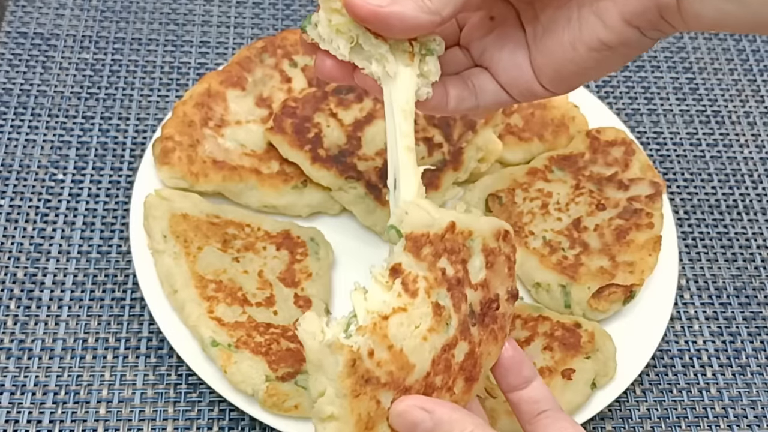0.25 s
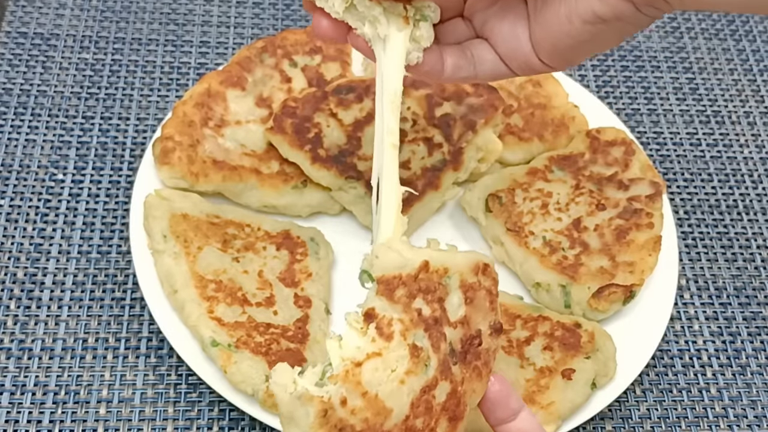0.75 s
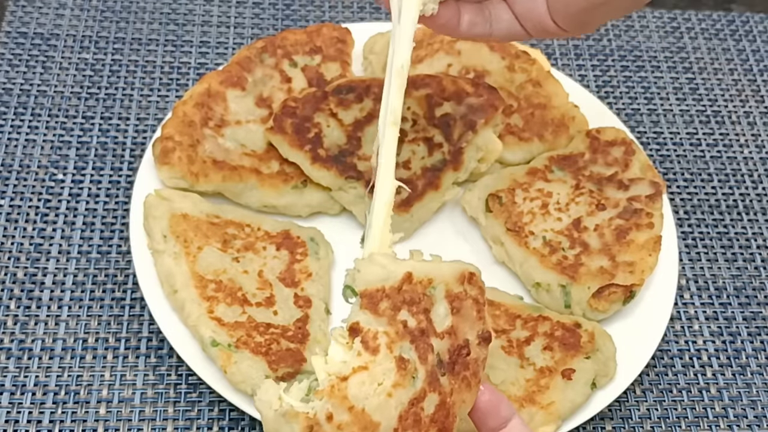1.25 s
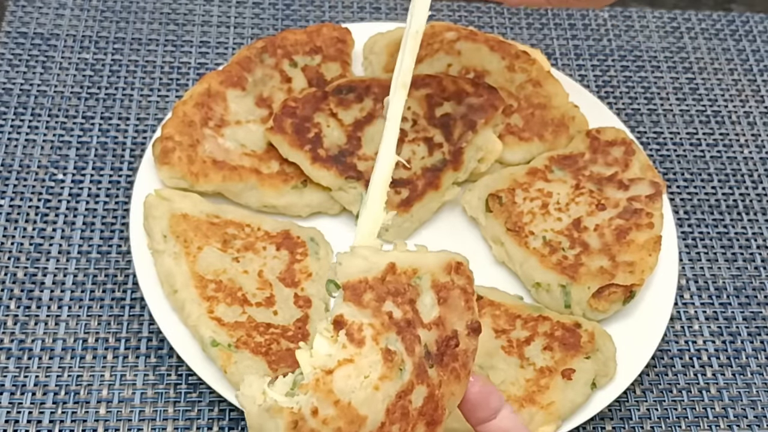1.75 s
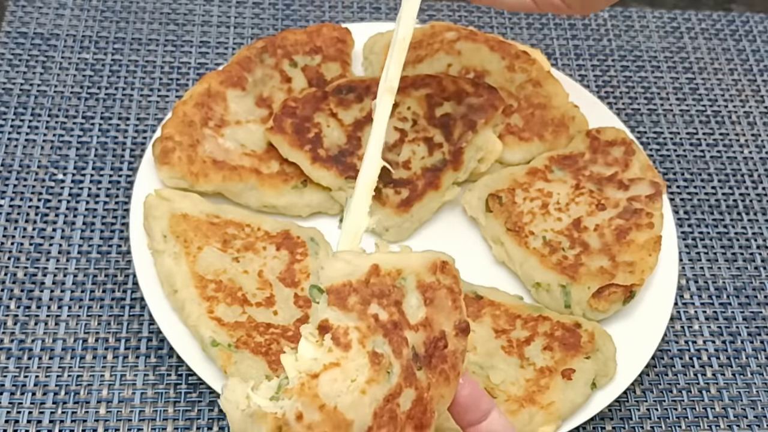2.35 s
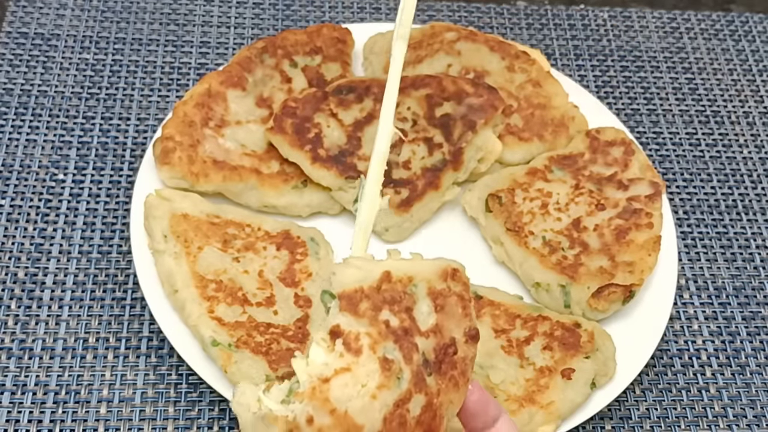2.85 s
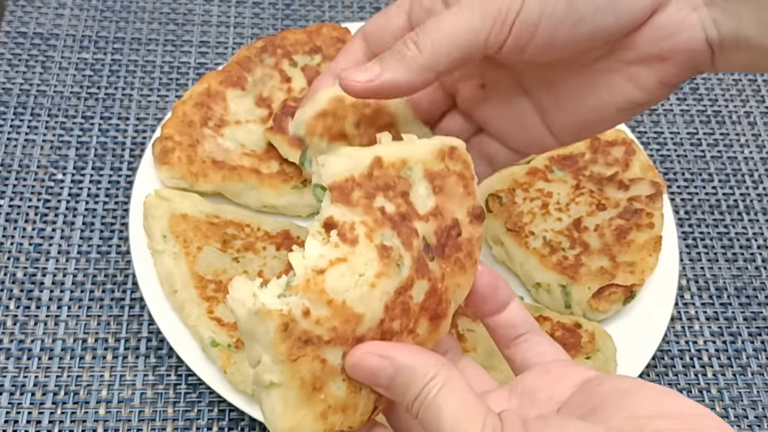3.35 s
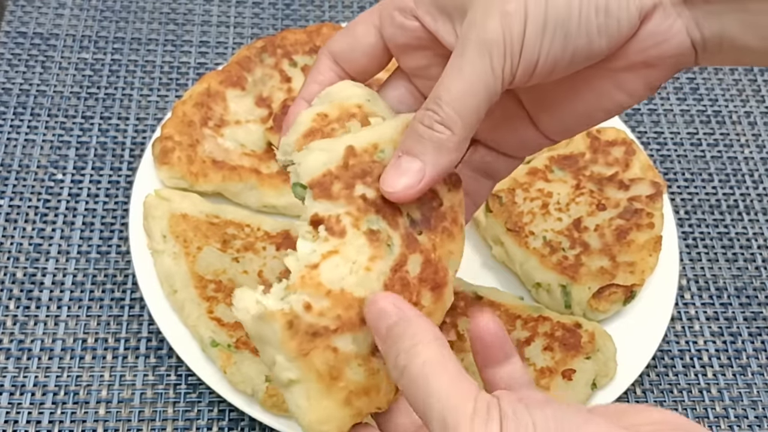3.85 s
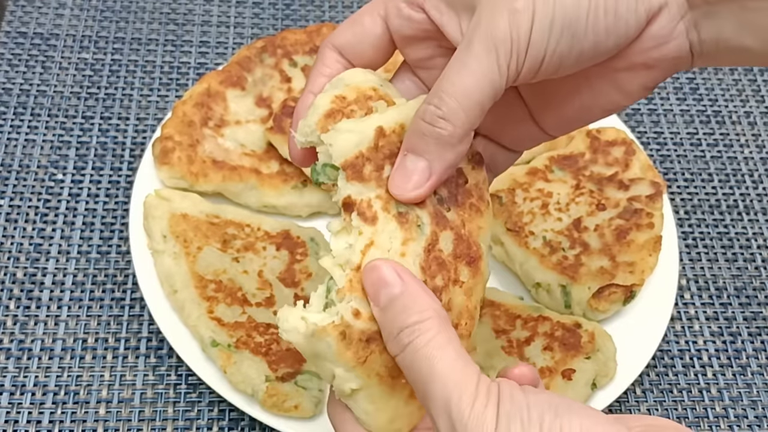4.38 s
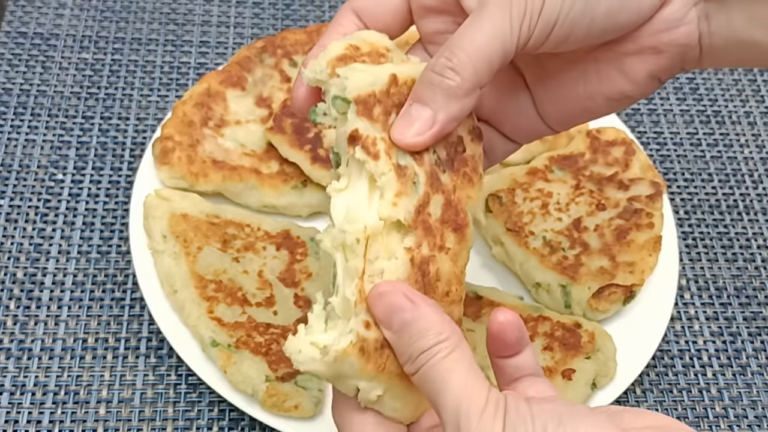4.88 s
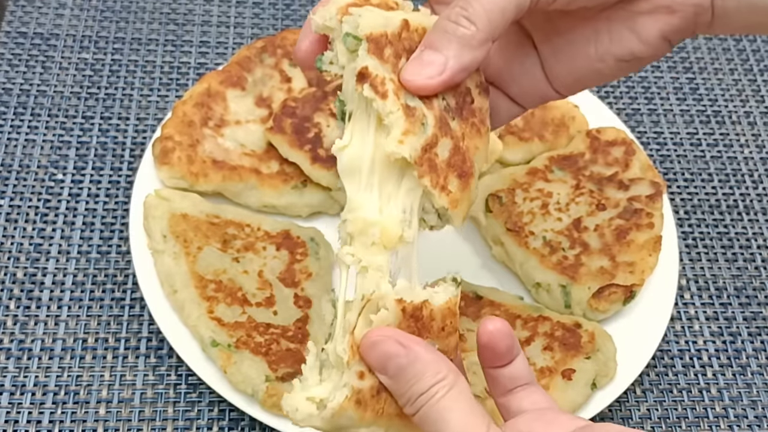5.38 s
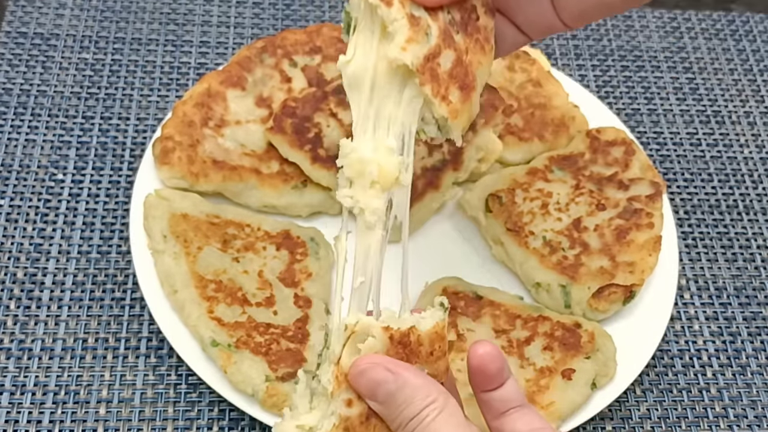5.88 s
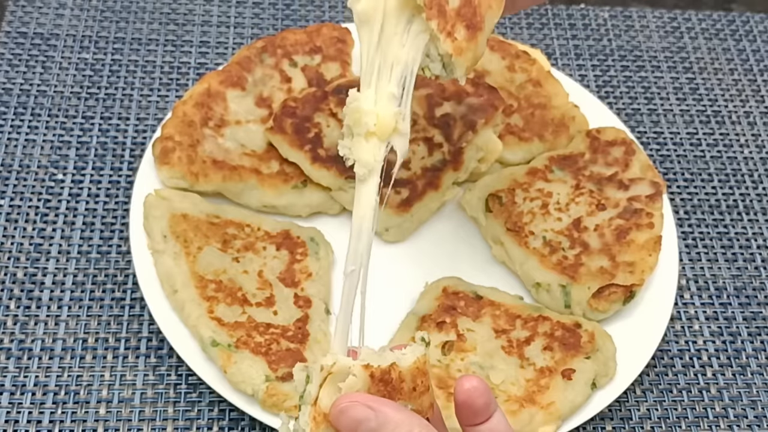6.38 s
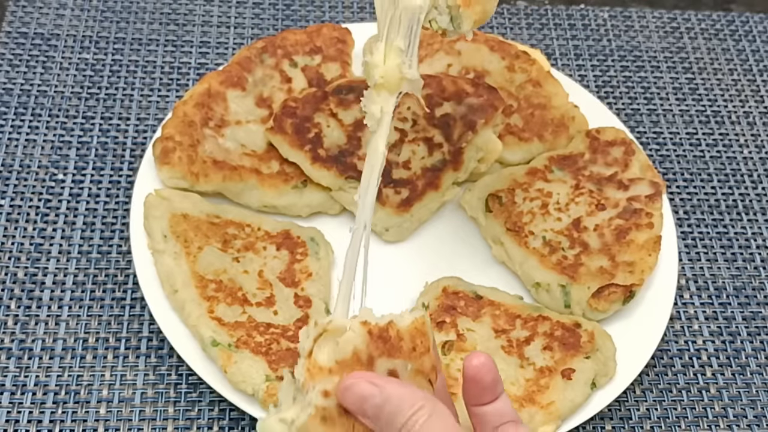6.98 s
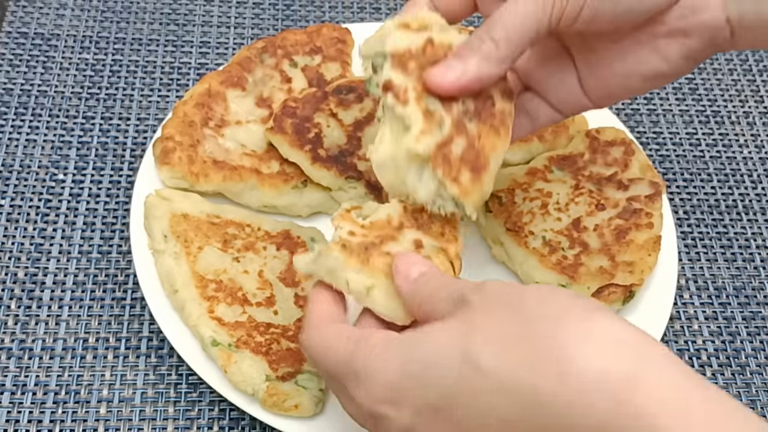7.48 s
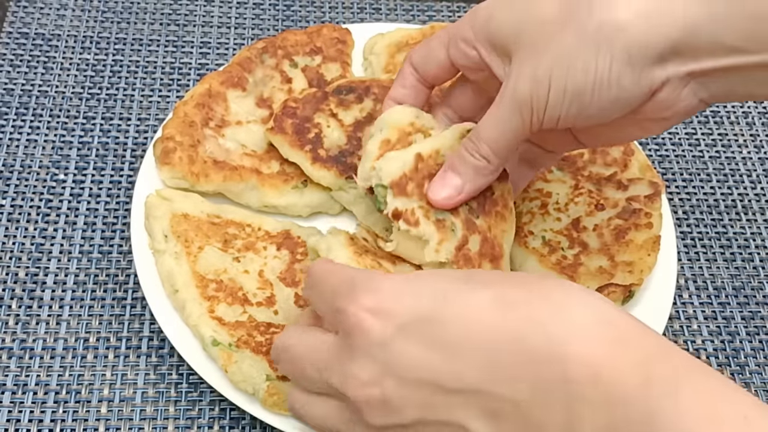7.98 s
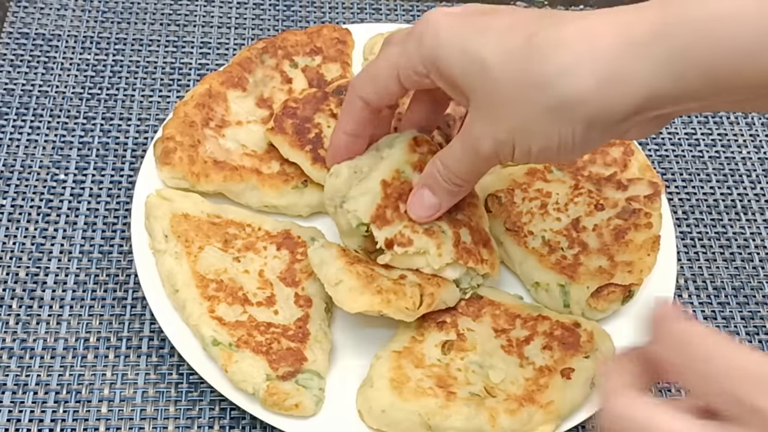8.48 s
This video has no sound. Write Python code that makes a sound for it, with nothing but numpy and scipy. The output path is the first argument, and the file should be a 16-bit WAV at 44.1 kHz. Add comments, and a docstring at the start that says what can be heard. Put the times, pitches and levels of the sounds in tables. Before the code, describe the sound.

Outdoors, a trickle of water rises from almost nothing on the left, bubbling and fizzing with small drips. An insect drones briefly, then a songbird gives tumbling notes, quick chips, a six-fold chant, clucks, a fast trill and three closing flourishes. On the right are only muffled rumble, low bumps and two faint china clinks, as from a microphone being handled.

```python
"""Rumble conducted through the recorder (right) and trickling water (left) begin; an insect drones briefly.
A songbird's gliding sines and octaves follow: tumbles, buzzes, chips, hooks, chants, clucks, a trill and
three closing flourishes. Two china clinks ring their modes on the right; a far bird pulses once; bumps
sweep down by dispersion. Close echoes and decaying noise tails set the left outdoors; the right gets only
a dull, late leak of it."""
import sys
import numpy as np
from scipy import signal
from scipy.fft import rfft, irfft, next_fast_len
from scipy.io import wavfile
from scipy.ndimage import uniform_filter1d, map_coordinates

SR = 44100
rng = np.random.default_rng(int(sys.argv[2]) if len(sys.argv) > 2 else 0)


def log_audio(samples):
    """Write samples as a 16-bit WAV file to the path given in sys.argv[1]."""
    # one column per channel
    frames = np.atleast_2d(samples).T
    # limit to full scale, then quantise
    limited = np.clip(frames, -1, 1)
    pcm = np.round(limited * 32767).astype(np.int16)
    wavfile.write(sys.argv[1], SR, pcm)


N = 384993

# Strength of the water flow over time, before the gain of each layer: t/s, level/dB
FLOW = [(0.0, -71), (.51, -65.5), (1.24, -61), (1.95, -59.5), (3.1, -55.5), (3.95, -52.5), (5.44, -52),
        (5.79, -53.5), (8.02, -56.5), (8.73, -57.5)]
# Decay of the dense scatter off nearby foliage: f/Hz, t60/s
LEAVES = [(1000, 0.029), (5000, 0.081), (12000, 0.07)]
# When each chant is sung: t/s, level change/dB, pitch shift/semitones
CHANTS = [(4.1887, -0.47, -.1), (4.3777, .6, 0.043), (4.567, -1.3, -0.2), (4.7596, -1.1, 0.3),
          (4.9459, -0.82, -0.09), (5.1415, 0.39, 0.89)]


def amp(db):
    """Level to amplitude: 20 dB is a factor of ten."""
    return 10 ** (np.asarray(db) / 20)


def unit(x):
    """Normalisation to an rms amplitude of 1."""
    return x / np.sqrt(np.mean(x ** 2) + 1e-20)


def along(points, hz):
    """Interpolation of (f/Hz, value) points on a logarithmic frequency axis."""
    f, v = np.transpose(points)
    return np.interp(np.log(hz + 1), np.log(f + 1), v)


def curves(rows):
    """Linear envelopes: one value per sample for each column after the time."""
    s, *columns = np.transpose(rows)
    return [np.interp(np.arange(N) / SR, s, column) for column in columns]


def wobble(rate):
    """Smooth random modulation: a spline through normal draws, rate knots a second."""
    knots = rng.standard_normal(int(N * rate / SR) + 4)
    return map_coordinates(knots, [np.arange(N) * rate / SR])


def filtered(x, response):
    """Linear filtering: the spectrum times a complex frequency response."""
    m = next_fast_len(N + SR // 2)
    return irfft(rfft(x, m) * response(np.fft.rfftfreq(m, 1 / SR)), m)[..., :N]


def noise(spectrum, patchy_db):
    """Coloured noise of rms 1, its short-time spectrum patched with random gain."""
    z = signal.stft(rng.standard_normal(N), nperseg=256)[2]
    field = uniform_filter1d(rng.standard_normal(z.shape), size=4, axis=0)
    field = uniform_filter1d(field, size=5, axis=1)
    x = signal.istft(z * amp(patchy_db * unit(field)), nperseg=256)[1][:N]
    return unit(filtered(x, lambda hz: amp(along(spectrum, hz))))


def add(track, s, sound):
    """Superposition: mixes a sound into the track from time s on."""
    part = track[max(round(s * SR), 0):][:len(sound)]
    part += sound[:len(part)]


def paths(taps):
    """Multipath propagation: the summed response of delayed copies."""
    return lambda hz: sum(amp(db) * np.exp(-2j * np.pi * hz * delay) for delay, db in taps)


def yard(x, decay):
    """Diffuse reverberation: a noise tail in which each frequency decays at its own rate."""
    hz, t, z = signal.stft(rng.standard_normal(SR // 2), SR, nperseg=128)
    t60 = along(decay, hz)[:, None]
    tail = signal.istft(z * amp(-60 * t / t60), SR, nperseg=128)[1]
    delayed = np.pad(x, (60, 0))  # samples
    return signal.fftconvolve(delayed, tail / np.linalg.norm(tail))[:N]


def handling():
    """Structure-borne sound: rumble in the recorder's body, and dispersive bumps, treble first."""
    # Rumble over time, before a common gain: t/s, level/dB
    rumble = [(0.0, -83.5), (.78, -73.5), (2.33, -66), (3.01, -66.5), (4.18, -59), (4.91, -63),
              (6.59, -62.5), (7.17, -56), (7.37, -51), (7.6, -64.5), (8.73, -65.5)]
    # Relative spectrum of the rumble: f/Hz, level/dB
    rumble_colour = [(7, -21), (14, 4), (36, 4.5), (89, -9.5), (163, -26.5), (265, -38), (450, -53),
                     (900, -62), (2000, -120)]
    # Shifting fingers swell the rumble: t/s, gain at the peak/dB
    shuffles = [(.28, 7), (.5, 4), (2.16, 5), (4.06, 14), (4.45, 11), (5.14, 10.5), (5.3, 8), (6.73, 16),
                (7.12, 12), (7.43, 14.5), (8.22, 9.5)]
    # Knocks on the case, before a common gain: t/s, level/dB, f about 42 ms in/Hz, swell time/s
    knocks = [(4.189, -26, 31, 0.04), (5.842, -41.5, 34.4, 0.023), (6.954, -21, 33.5, 0.036),
              (7.031, -36.5, 48.6, 0.02), (7.271, -24, 31, .02), (7.486, -38.5, 35.4, 0.014)]
    shuffle_s, case_hz = .034, 242  # half width of a swell at 1/e; corner of the case's two-pole low-pass
    level_db, = curves(rumble)
    swell_db = sum(db * np.exp(-((np.arange(N) / SR - s) / shuffle_s) ** 2) for s, db in shuffles)
    out = amp(level_db + swell_db + 6.5 + 2.15 * wobble(12)) * noise(rumble_colour, patchy_db=3.0)
    t, bumps = np.arange(SR // 3) / SR, np.zeros(N)
    for s, db, hz, swell in knocks:
        # bending waves disperse: the pitch keeps falling as slower waves arrive
        phase = 2 * np.pi * np.cumsum(hz * (0.044 / (t + 0.0019)) ** 0.65) / SR
        onset = 1 - np.exp(-t / 0.00067)
        size = onset * (0.33 + t / swell) * np.exp(-(t / swell) ** 2.28 / 2)
        add(bumps, s, amp(db + 3.5) * size * np.sin(phase))
    return out + filtered(bumps, lambda hz: 1 / (1 + 1j * hz / case_hz) ** 2)


def bubble(hz, t60, rise):
    """Bubble resonance: a damped sine whose pitch climbs as the bubble nears the surface."""
    t = np.arange(round(t60 * SR)) / SR
    tone = np.sin(2 * np.pi * hz * t * (1 + rise * t / t60))
    return tone * amp(-60 * t / t60) * (1 - np.exp(-t / 0.0019))


def grains(count, hz, spread, cycles, size_db):
    """Random superposition of bubbles, log-normal in pitch, few loud among many faint; rms 1."""
    track = np.zeros(N)
    for when, pitch, size in zip(rng.random(count), rng.standard_normal(count), rng.exponential(1, count)):
        f = np.clip(hz * np.exp(spread * pitch), 300, 13000)
        add(track, when * N / SR, amp(size_db * min(size, 3.5)) * bubble(f, cycles / f, 0.17))
    return unit(track)


def trickle():
    """Turbulent flow: noise and massed bubbles in a gurgling and a fizzing band follow the flow."""
    # Relative spectrum of the gurgle: f/Hz, level/dB
    gurgle = [(210, -24.5), (350, -34), (565, -17), (749, -18.5), (992, -4.5), (1420, -6.5), (1730, 0),
              (2590, -12), (3150, -19.5), (3300, -44), (4290, -32), (7260, -120)]
    # Relative spectrum of the fizz: f/Hz, level/dB
    fizz = [(2600, -35.5), (3200, -8), (3900, -4.5), (4400, -7), (5300, 1.5), (6000, -8), (6800, -10),
            (8000, -2.5), (9200, -9), (10300, -1.5), (11300, -10), (12000, -25), (12700, -11.5),
            (14500, -37), (15700, -24)]
    flow_db, = curves(FLOW)
    surge = wobble(2.98)
    bubbles = grains(count=900, hz=1562, spread=0.3145, cycles=65.0, size_db=3.5)
    bubbles = unit(filtered(bubbles, lambda hz: amp(along(gurgle, hz))))
    low = noise(gurgle, patchy_db=3.5) + amp(-5.0) * bubbles
    spray = grains(count=1500, hz=7370, spread=0.436, cycles=9.3, size_db=12)
    spray = unit(filtered(spray, lambda hz: amp(along(fizz, hz))))
    high = noise(fizz, patchy_db=4.0) + amp(-12.5) * spray
    return amp(flow_db + 5 + 0.54 * surge) * low + amp(flow_db + 2.17 + 0.43 * surge) * high, fizz


def drips(out):
    """Single bubble resonances: smaller, higher bubbles are damped sooner."""
    # The loudest drips, before a common gain: t/s, level/dB, initial f/Hz
    falls = [(.225, -50.5, 1630), (1.381, -46.5, 1630), (1.539, -45.5, 1730), (2.169, -43, 2170),
             (2.269, -44.5, 1970), (2.408, -45.5, 1340), (2.743, -40, 1676), (2.775, -39.5, 1705),
             (2.819, -44, 1970), (3.045, -46, 889), (3.074, -31.5, 1102), (3.184, -38, 1950),
             (3.499, -39, 2400), (3.714, -33, 1350), (4.309, -32, 1300), (4.632, -34.5, 1086),
             (5.157, -34.5, 1660), (5.709, -38, 1950), (5.827, -40.5, 2020), (5.891, -44, 1744),
             (6.061, -38.5, 1047), (6.181, -46, 976), (6.568, -48.5, 840), (6.784, -36, 1650),
             (7.506, -39, 1690), (7.558, -48, 967)]
    for s, db, hz in falls:
        t60 = .055 * (1000 / hz) ** 0.75  # 55 ms at 1 kHz
        add(out, s, amp(db + 10.5) * bubble(hz, t60, 0.075))


def splash_ticks(fizz):
    """Impact sound: a noisy snap with a brief ring, coloured like the fizz and scattered by leaves."""
    # Splash ticks, before a common gain: t/s, level/dB, f of the ring/Hz
    ticks = [(2.329, -36, 7800), (2.7108, -39, 10440), (4.1335, -48, 10100), (5.0603, -33.5, 8290),
             (5.1894, -33.5, 5110), (5.566, -36, 5460), (6.27, -35, 9900), (6.3923, -34.5, 3880),
             (6.5657, -36.5, 9900), (6.6968, -34.5, 6500), (6.9521, -45, 10200), (7.119, -35, 4660),
             (7.266, -34.5, 4960), (8.3235, -38, 8040)]
    snaps, t = np.zeros(N), np.arange(400) / SR
    for s, db, hz in ticks:
        size = amp(db + 11.5 - 60 * t / 0.0094) * (1 - np.exp(-t / 0.0004))
        add(snaps, s, size * (0.95 * rng.standard_normal(len(t)) + np.sin(2 * np.pi * hz * t)))
    snaps = filtered(snaps, lambda hz: amp(along(fizz, hz)))
    return snaps + amp(-2) * yard(snaps, LEAVES)


def water():
    """Superposition of the steady trickle, its loudest drips and its splash ticks."""
    out, fizz = trickle()
    drips(out)
    return out + splash_ticks(fizz)


def hum():
    """Stationary low-frequency noise, faint beneath the left channel."""
    colour = [(15, 2.5), (100, -6.0), (260, -24), (300, -3.5), (340, -15.5), (700, -37.0)]  # f/Hz, level/dB
    return amp(-75.5) * noise(colour, patchy_db=-0.5)


def hiss():
    """Amplitude-modulated noise: a faint hiss on the right that follows the flow."""
    colour = [(200, -5), (600, -11), (1500, -8), (3000, -12.5), (8000, -22.5), (15000, -42)]  # f/Hz, level/dB
    return amp(curves(FLOW)[0] - 23.5) * noise(colour, patchy_db=-0.5)


def insect():
    """Narrow-band noise: its slow random beating gives a faint fuzzy drone that soon stops."""
    # The drone over time, before a random flutter: t/s, level/dB
    drone = [(.05, -76), (.15, -68.5), (.5, -63), (.62, -67), (.7, -110)]
    # Gaussian bands of the drone: f/Hz, width/Hz, relative level/dB
    drone_bands = [(4350, 89, -2), (3600, 180, -9)]
    level_db, = curves(drone)

    def bands(f):
        return sum(amp(db) * np.exp(-((f - hz) / width) ** 2) for hz, width, db in drone_bands)
    return amp(level_db + 2.2 * wobble(26.1)) * unit(filtered(rng.standard_normal(N), bands))


def whistle(tone, octave, s, length, hz, db, octave_db):
    """Frequency modulation in the syrinx: a gliding sine and its octave, faded in and out."""
    edge = np.clip(.2 * length, .001, .005)
    t = np.arange(round((length + edge) * SR)) / SR
    knots = np.linspace(.08, .92, len(hz)) * t[-1]
    pitch = np.polyval(np.polyfit(knots, hz, len(hz) - 1), t)  # a smooth arch through the points
    level = uniform_filter1d(np.interp(t, knots, db), len(t) // 6 + 1, mode="nearest")
    phase = 2 * np.pi * np.cumsum(pitch) / SR
    fade = np.sqrt(2) * np.sin(np.pi / 2 * np.clip(np.minimum(t, t[-1] - t) / edge, 0, 1)) ** 2
    add(tone, s - edge / 2, fade * amp(level) * np.sin(phase))
    add(octave, s - edge / 2, fade * amp(octave_db) * np.sin(2 * phase))


def syllables(tone, octave):
    """Repetition with variation: most patterns recur, shifted in level and pitch; sweeps are sung once."""
    # Glides of each syllable, one note a row: t after its start/s, length/s,
    # f at 4 even steps/Hz (4 columns), level at those steps/dB (4 columns), octave level/dB
    tumble = [(0, .029, 4090, 4160, 4520, 5450, -58, -42.5, -37.5, -30.5, -46),
              (.0295, .022, 5180, 4200, 3110, 2730, -45, -35.5, -34.5, -35, -50.5)]
    landing = [(0, .04, 2633, 2616, 2634, 2450, -37.5, -47, -60, -43, -61),
               (.0405, .02, 2194, 1983, 1860, 1600, -34, -26.5, -35.5, -40, -72)]
    chip = [(0.00094, .023, 6880, 7450, 7650, 8500, -50, -52.5, -56.5, -66, -76)]
    hook = [(-.001, 0.0089, 3630, 3710, 3700, 3720, -33, -27, -29, -36, -60),
            (.011, 0.0228, 3230, 3330, 3468, 3730, -32, -26.5, -18.5, -20, -57),
            (.042, .03, 5130, 4240, 3850, 3570, -25, -29.5, -33, -32, -37)]
    chant = [(.015, .024, 2786, 2757, 2843, 2873, -26, -23.5, -23, -22, -52),
             (.0905, .032, 1218, 1466, 1490, 1400, -35, -37, -30.5, -53, -54)]
    cluck = [(0, 0.0189, 1410, 1203, 1145, 1110, -41, -43.5, -39.5, -43, -60.5)]
    flourish = [(0, 0.0096, 2100, 2075, 2204, 2300, -43, -29.5, -26.5, -48, -70),
                (.013, 0.031, 2400, 2707, 2754, 2756, -25, -27.5, -22.5, -32.5, -46),
                (.083, .019, 1820, 1530, 1380, 1365, -22.5, -39, -35, -61, -65)]
    # Loud notes sung once: the same columns, with t from the start of the scene
    sweeps = [(3.31, 0.056, 4970, 3720, 3180, 2990, -33, -20.5, -28, -34, -38.5),
              (4.031, 0.073, 1997, 1520, 1376, 1410, -20, -34, -32, -33, -71),
              (7.639, 0.037, 5064, 5370, 5420, 5210, -27, -21, -33.5, -24, -46),
              (7.74, 0.057, 3130, 2320, 2230, 2400, -30.5, -29.5, -41, -26, -65),
              (7.84, 0.079, 3200, 3266, 3307, 3170, -41, -29, -34, -28, -80)]
    # When each syllable is sung: t/s, level change/dB, pitch shift/semitones
    tumbles = [(.683, -2, 0.41), (.872, 0.5, -0.395)]
    landings = [(.734, -1.5, .1), (.926, 1.3, -0.11)]
    chips = [(2.79, -4, -.1), (2.826, 3.5, 0.16), (2.866, 3.5, -.1), (2.905, 2, .2), (2.942, 6, .4),
             (2.98, 5, -.2), (3.021, 6, -0.24)]
    hooks = [(3.81, -0.27, -0.057), (3.9121, 0.48, 0.057)]
    clucks = [(7.306, 0.52, -0.12), (7.348, 1.6, 0.36), (7.404, -1.1, -0.56), (7.452, 0.8, 0.4)]
    flourishes = [(8.361, -0.96, 0.27), (8.507, 0.29, -0.24), (8.656, 0.25, .1)]
    repertoire = [(tumble, tumbles), (landing, landings), (chip, chips), (hook, hooks), (chant, CHANTS),
                  (cluck, clucks), (flourish, flourishes), (sweeps, [(0, 0, 0)])]
    for pattern, sung in repertoire:
        for s, db, semitones in sung:
            for after, length, *rest in np.array(pattern):
                hz = np.multiply(rest[:4], 2 ** (semitones / 12))
                whistle(tone, octave, s + after, length, hz, np.add(rest[4:8], db), rest[8] + db)


def buzzes(tone, octave):
    """Wide frequency modulation: a fast uneven warble smears the pitch into a band."""
    # Buzzes: t/s, length/s, centre f/Hz, mean level/dB, octave relative to the tone/dB
    rows = [(5.333, 0.038, 6800, -27, -12.5), (1.088, 0.022, 5700, -40.5, -12)]
    for s, length, hz, db, octave_db in rows:
        t = np.arange(round(length * SR)) / SR
        warble = np.sin(2 * np.pi * 370 * t + 1.63 * wobble(200.0)[:len(t)])
        phase = 2 * np.pi * np.cumsum(hz * (1 + 0.16 * warble)) / SR
        swell = amp(db - 3.3 * warble) * np.sin(np.pi * (t / length) ** 1.13)
        add(tone, s, swell * np.sin(phase))
        add(octave, s, amp(octave_db) * swell * np.sin(2 * phase))


def three_point_glides(tone, octave):
    """Glides through three pitches, each softer at its ends than on a straight ramp."""
    # Notes sung once, and the held end of the last chant's whistle: t/s, length/s,
    # f at start, middle and end/Hz (3 columns), level at the middle/dB, end over start/dB, octave level/dB
    glides = [(1.111, 0.15, 1984, 2010, 1880, -57.5, -1.5, -56),
              (3.195, .009, 3600, 3140, 2450, -39, -1, -63),
              (3.273, 0.029, 3420, 3370, 3460, -33.5, -4, -64),
              (4.028, 0.035, 953, 930, 880, -38, -15, -37), (5.111, 0.02, 1013, 1010, 1030, -41, -13, -58),
              (5.175, .02, 2995, 2970, 2970, -25, -10, -46),
              (5.34, 0.084, 3480, 3700, 3300, -48.5, -2, -54),
              (5.356, 0.019, 1480, 1340, 1500, -37, 4, -48), (5.425, 0.038, 6420, 5300, 4130, -39, .3, -51),
              (6.929, .14, 3610, 3640, 3700, -52.5, 11, -66),
              (7.15, 0.049, 4390, 4660, 4300, -45.5, 6, -58), (7.201, .012, 5700, 5660, 6300, -42, 3, -51),
              (7.961, 0.026, 1050, 1030, 1200, -46.5, -11, -52)]
    swell_db = 1.5
    for s, length, *hz, db, tilt_db, octave_db in glides:
        arch_db = np.array([-tilt_db / 2 - swell_db, 0, tilt_db / 2 - swell_db])
        whistle(tone, octave, s, length, hz, db + arch_db, octave_db)


def clinks():
    """Modal vibration: light taps on a china plate ring its modes at new strengths."""
    # Taps: t/s, level/dB
    taps = [(2.241, -59), (2.379, -57)]
    # Modes of the plate: f/Hz, level before a random change at each tap/dB, t60/s
    china = [(1066, -15, .25), (1620, -2, 0.18), (1940, 3, 0.27), (2900, -14, 0.16), (5316, -6, 0.18),
             (6360, -13, .12), (6630, -4, .2), (7200, -15, .15)]
    out, t = np.zeros(N), np.arange(SR // 4) / SR
    onset = 1 - np.exp(-t / .003)
    for s, db in taps:
        for hz, level, t60 in china:
            decay = amp(db + level + rng.normal(0, 2.8) - 60 * t / t60)
            add(out, s, decay * onset * np.sin(2 * np.pi * hz * t))
    return out


def pulses(start, step, count):
    """Periodic train with chance on each pulse: (index, t/s, three normal draws)."""
    return [(k, start + k * step, *draw) for k, draw in enumerate(rng.standard_normal((count, 3)))]


def far_bird(tone, octave):
    """Pulse train of short downward glides, each joined by a lower voice: a distant bird."""
    for _, s, a, b, _ in pulses(start=3.467, step=.0256, count=12):
        hz, db = 2755 * (1 + .025 * a), -46.5 + 2.5 * b
        whistle(tone, octave, s, 0.0056, [hz * 1.024, hz * 0.954], [db, db], db - 42)
        whistle(tone, octave, s, 0.0073, [hz * .76, hz * 0.703], [db - 3 * a, db - 3 * a], db - 42)


def chant_snaps(tone, octave):
    """Rapid downward glide: a steep 7 ms drop opens each chant."""
    # The drop at even steps: f/Hz, relative level/dB
    snap_shape = [(6100, -6), (4880, -1), (4010, -13), (3350, -7)]
    shape_hz, shape_db = np.transpose(snap_shape)
    for s, db, _ in CHANTS:
        whistle(tone, octave, s - .001, .007, shape_hz, -24.5 + db + shape_db, -38.5 + db)


def trill(tone, octave):
    """Pulse train: each pulse is a loud blip, a steep upward flick and a lower undertone."""
    for k, s, a, b, c in pulses(start=7.9872, step=.0269, count=12):
        early = np.exp(-k / 2.6)  # it starts softer and higher
        hz = 5387 * (.98 + 0.072 * early + 0.021 * a)
        db = -29 - 11 * early + 1.5 * (-1) ** k + 0.65 * b  # levels alternate from pulse to pulse
        octave_db = -45.5 - 4 * early + 3 * c
        whistle(tone, octave, s, 0.0026, [hz * 1.004, hz * 0.998], [db + 1.5, db + 0.5], octave_db - 4.5)
        whistle(tone, octave, s + 0.0018, 0.0026, [hz * 1.065, hz * 1.3], [db - 8, db - 9.5], octave_db)
        whistle(tone, octave, s + 0.00107, 0.0055, [hz * 0.65, hz * 0.68], [db - 21, db - 20.5], db - 38)


def outdoors(tone, octave):
    """Multipath propagation: tone and octave reach the microphone by different paths and tails."""
    # Close echoes of the tone: delay/s, level/dB
    echoes = [(.004, -7), (.0062, -16), (.012, -16), (0.018, -16.5), (.027, -25)]
    # Several strong paths of the octave: relative delay/s, level before its colour/dB
    octave_paths = [(-.006, 2), (-.002, -1.5), (0, 5), (.006, 3.5), (.008, 1.5), (.012, -1.5)]
    # Colour of the octave, before a common gain: f/Hz, level/dB
    octave_colour = [(1500, -3.5), (5500, -10.5), (7400, -32), (8300, -2.5), (9200, 5.5), (10200, 14.5),
                     (11300, 3), (12000, -0.5), (12700, 4.5), (13800, -17), (15500, -34)]
    # Decay of the open yard: f/Hz, t60/s
    yard_decay = [(500, 0.082), (3000, 0.28), (6000, 0.21), (12000, 0.13)]
    direct = [(0.000062, 0.018)]  # delay/s, level/dB
    low = filtered(tone, paths(direct + list(echoes)))
    high = filtered(octave, lambda hz: amp(along(octave_colour, hz) - 8.0) * paths(octave_paths)(hz))
    low += amp(-8) * yard(low, LEAVES) + amp(-18) * yard(low, yard_decay)
    return low + high + amp(-5.5) * yard(high, LEAVES) + amp(-18.0) * yard(high, yard_decay)


def birds():
    """Source and path: clear and hoarse voices, made unsteady, then propagated outdoors."""
    clear, hoarse = np.zeros((2, 2, N))  # each holds a tone and an octave track
    syllables(*clear)
    buzzes(*clear)
    three_point_glides(*clear)
    far_bird(*clear)
    chant_snaps(*hoarse)
    trill(*hoarse)
    rasp = amp(2.56 * np.array([wobble(1100), wobble(1300)]))  # fast random amplitude modulation
    unsteady = amp(1.2 * wobble(70))  # the voice is never quite steady
    tone, octave = (clear + rasp * hoarse) * unsteady
    return outdoors(tone, octave)


def leak(song, stream):
    """Transmission loss and delay: the right port gets a dull copy half a millisecond later."""
    loss = [(500, -50), (1500, -44.5), (3000, -37.5), (6000, -53), (10000, -69)]  # f/Hz, level/dB

    def response(hz):
        return np.exp(-2j * np.pi * hz * .0005) * amp(along(loss, hz))
    return filtered(song + amp(1) * stream, response)


def scene():
    """Two-channel superposition: birds, water, insect and hum left; handling, clinks, leak and hiss right."""
    stream = water()
    song = birds()
    left = song + stream + insect() + hum()
    right = handling() + clinks() + leak(song, stream) + hiss()
    return np.array([left, right])


def record(dry):
    """Band limitation: the recorder keeps nothing from 15.72 kHz up."""
    return filtered(dry, lambda hz: hz < 15720)


dry = scene()
out = record(dry)
log_audio(out)
```